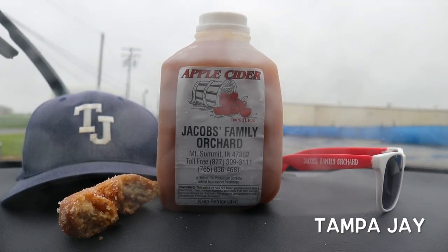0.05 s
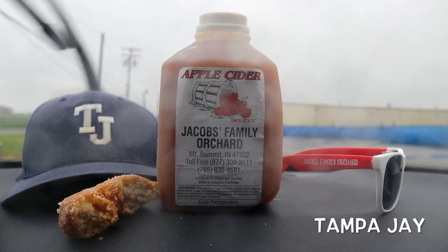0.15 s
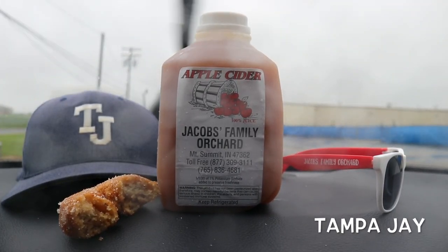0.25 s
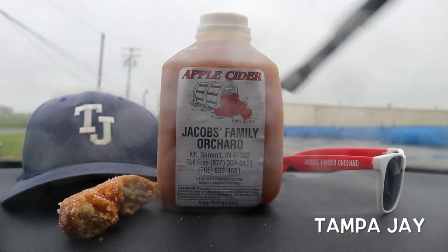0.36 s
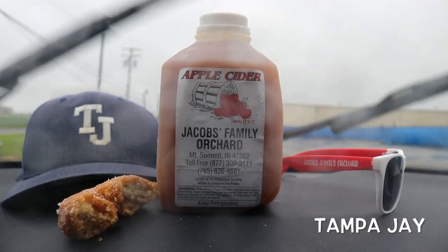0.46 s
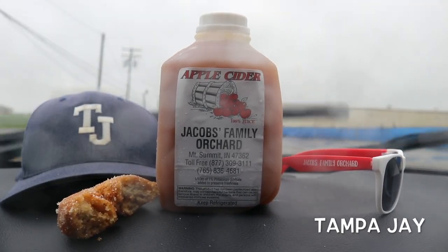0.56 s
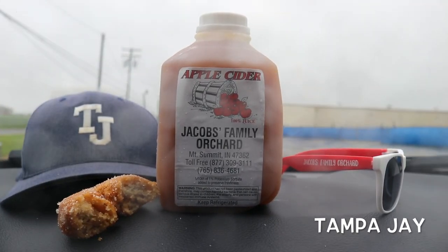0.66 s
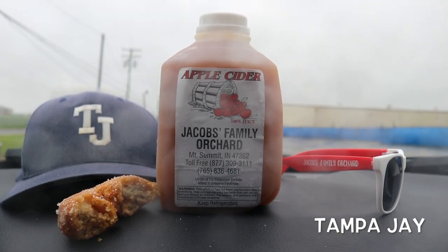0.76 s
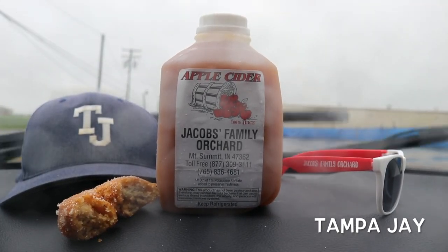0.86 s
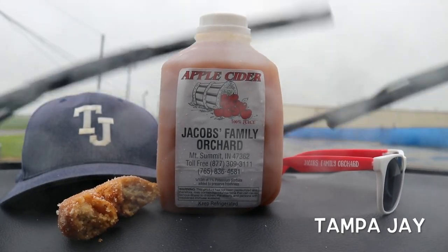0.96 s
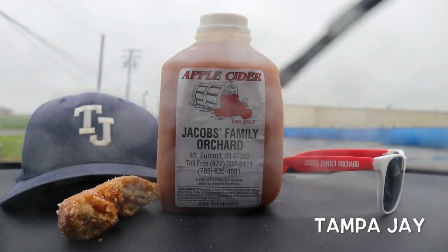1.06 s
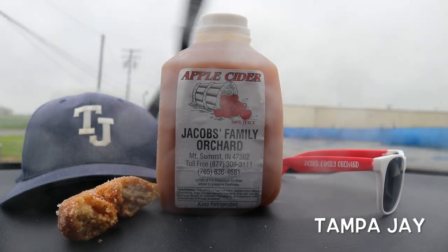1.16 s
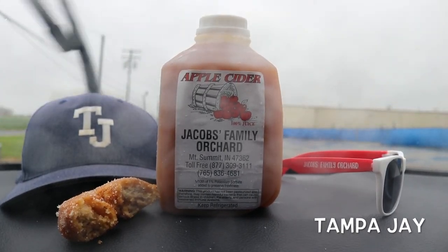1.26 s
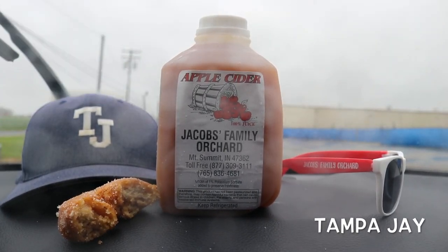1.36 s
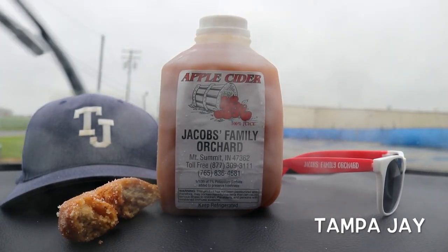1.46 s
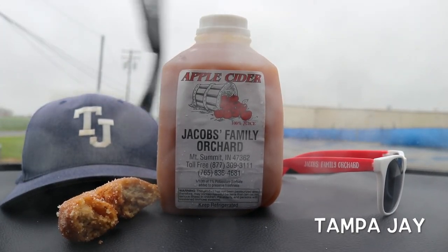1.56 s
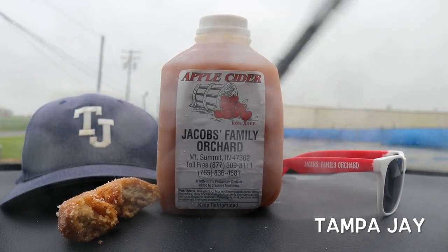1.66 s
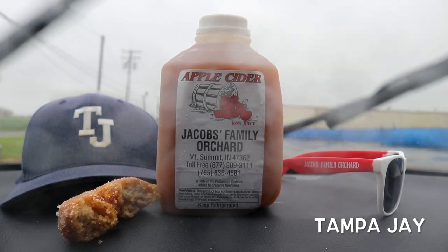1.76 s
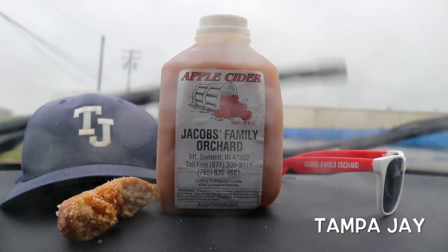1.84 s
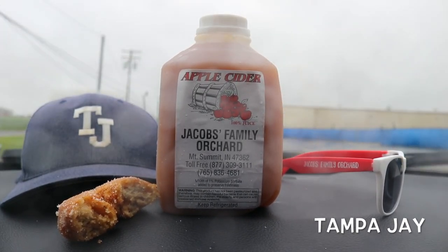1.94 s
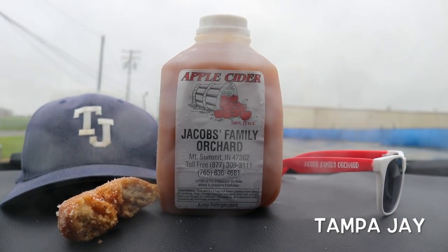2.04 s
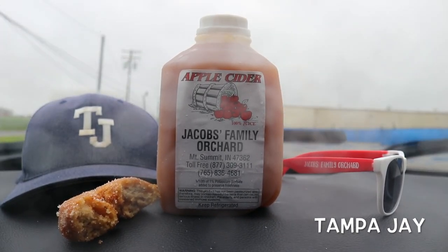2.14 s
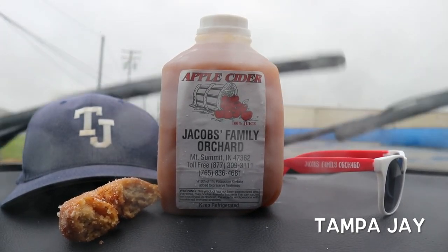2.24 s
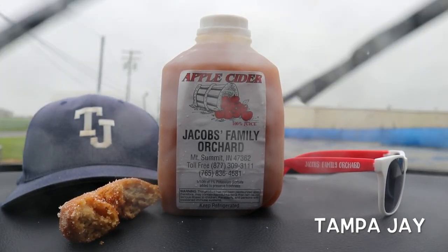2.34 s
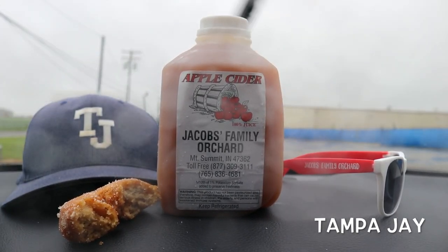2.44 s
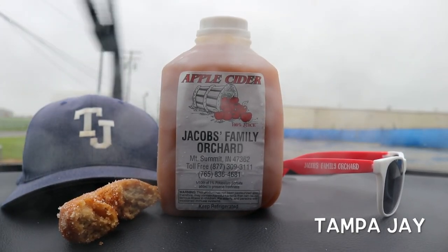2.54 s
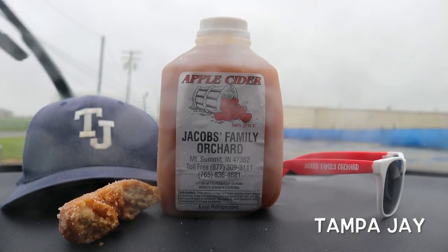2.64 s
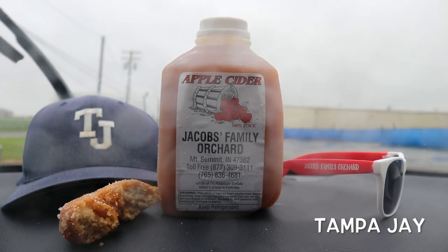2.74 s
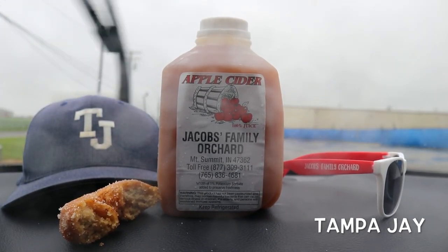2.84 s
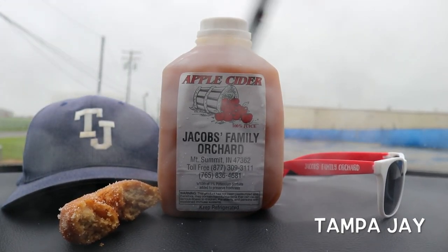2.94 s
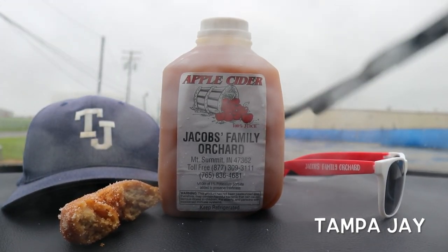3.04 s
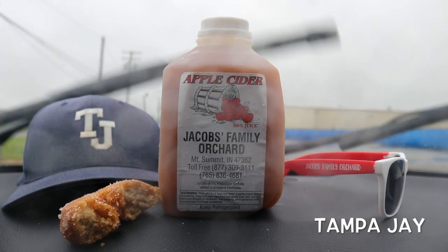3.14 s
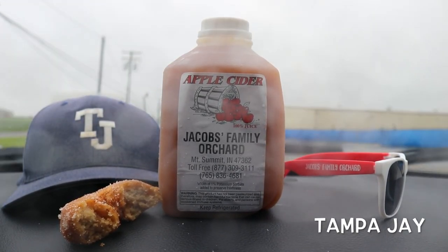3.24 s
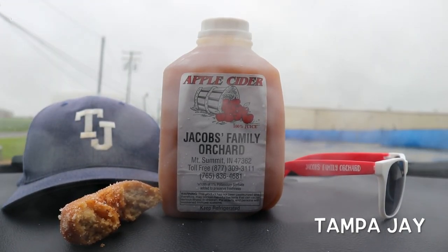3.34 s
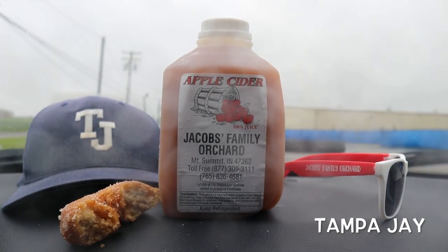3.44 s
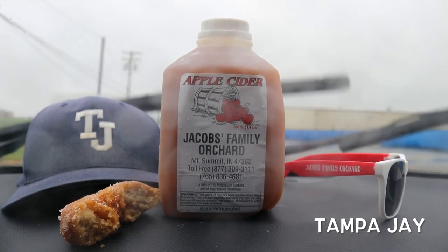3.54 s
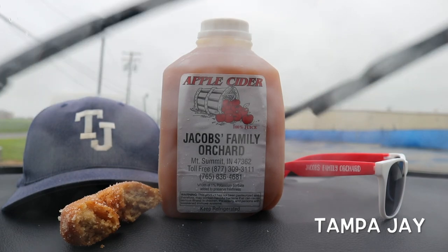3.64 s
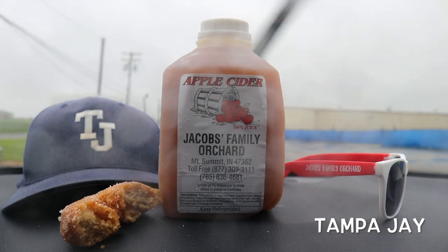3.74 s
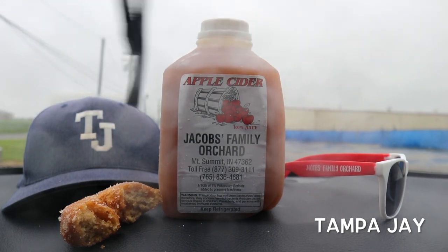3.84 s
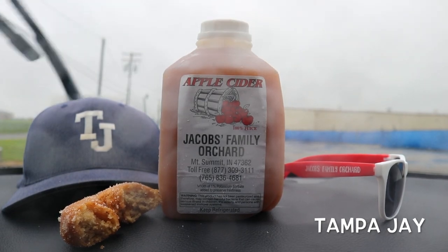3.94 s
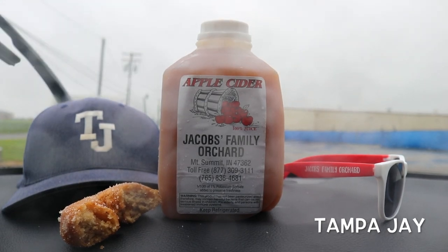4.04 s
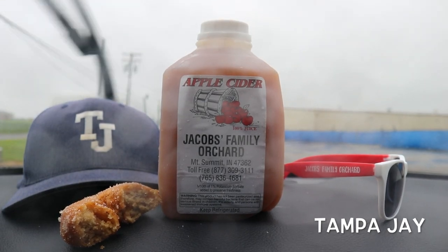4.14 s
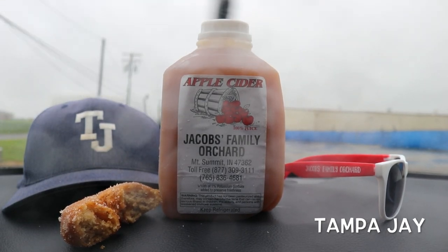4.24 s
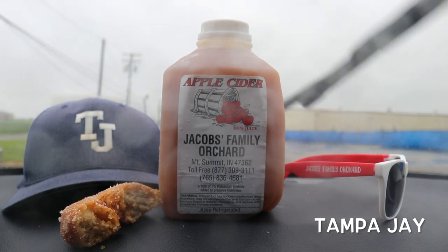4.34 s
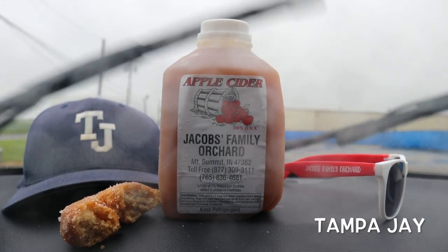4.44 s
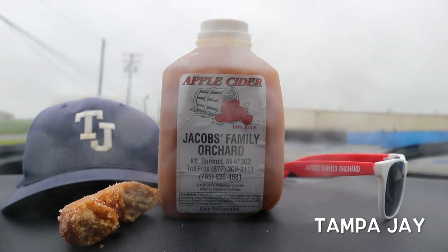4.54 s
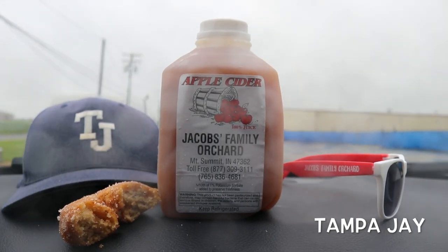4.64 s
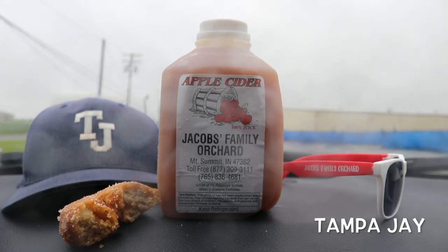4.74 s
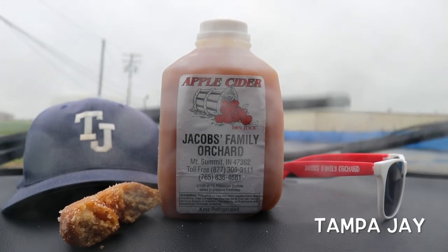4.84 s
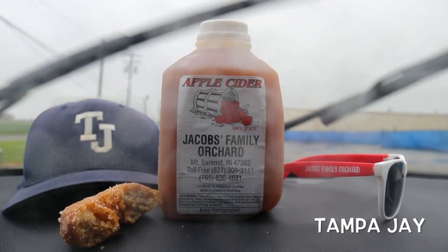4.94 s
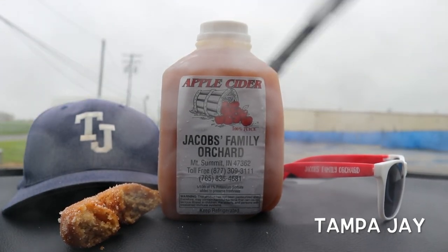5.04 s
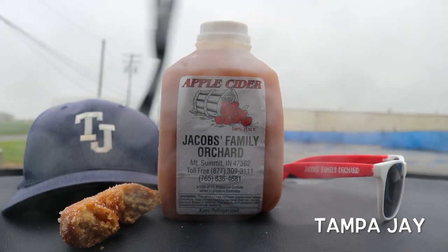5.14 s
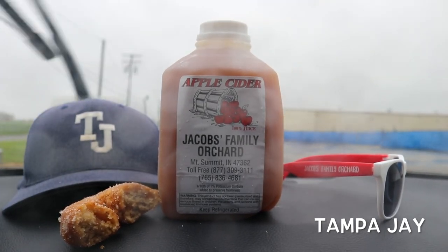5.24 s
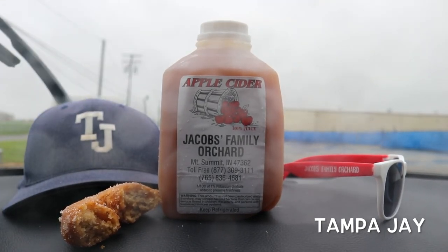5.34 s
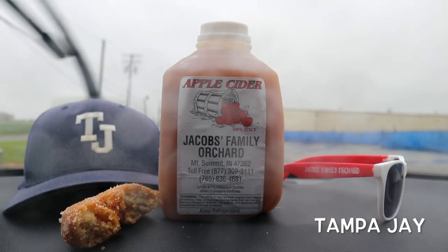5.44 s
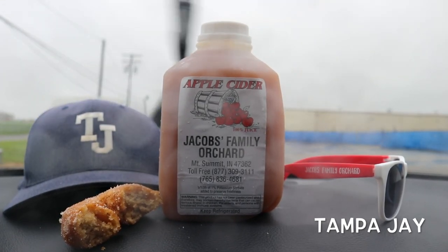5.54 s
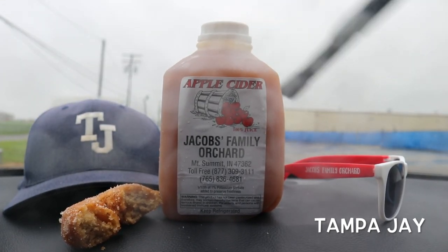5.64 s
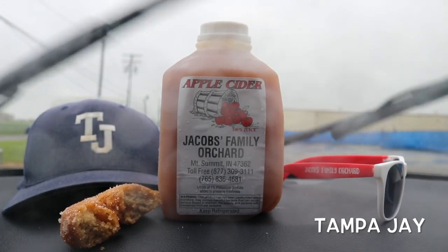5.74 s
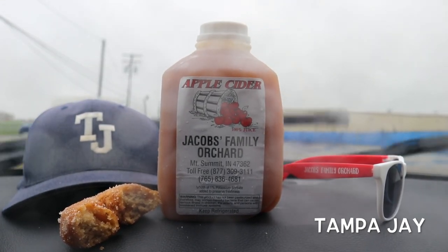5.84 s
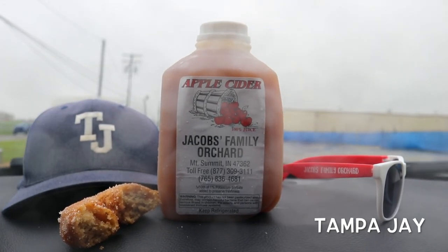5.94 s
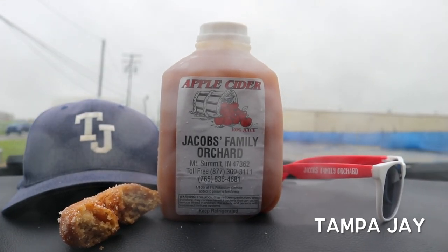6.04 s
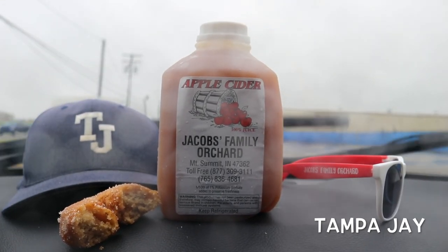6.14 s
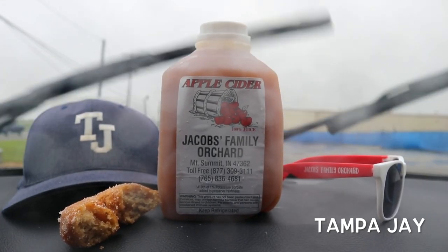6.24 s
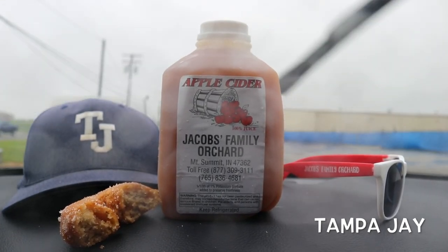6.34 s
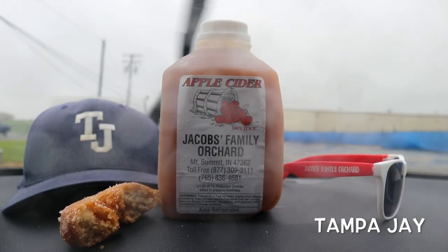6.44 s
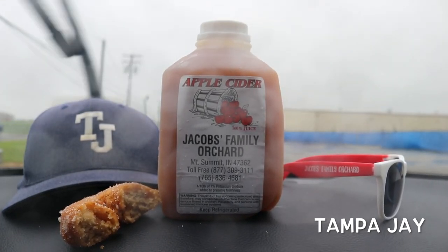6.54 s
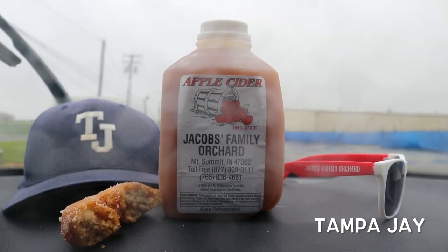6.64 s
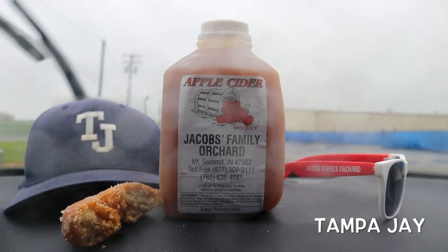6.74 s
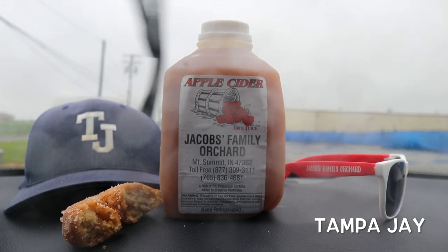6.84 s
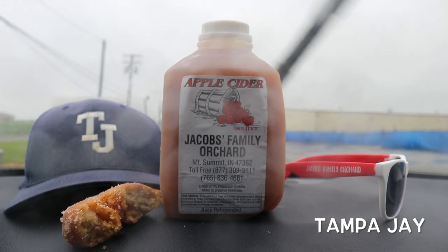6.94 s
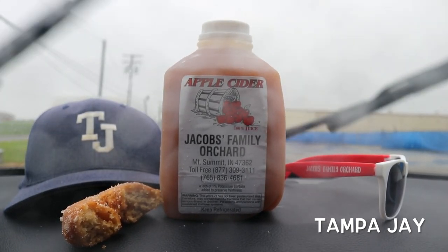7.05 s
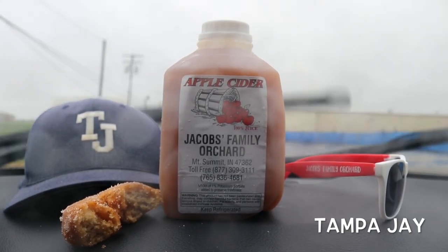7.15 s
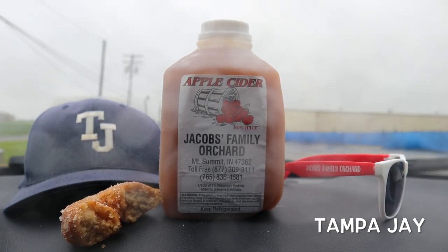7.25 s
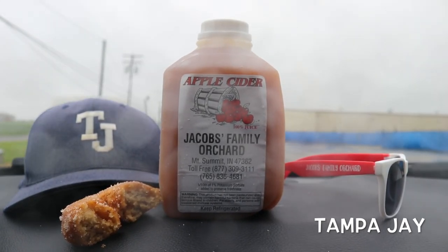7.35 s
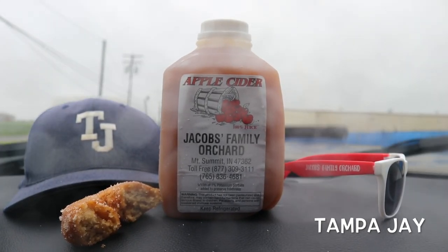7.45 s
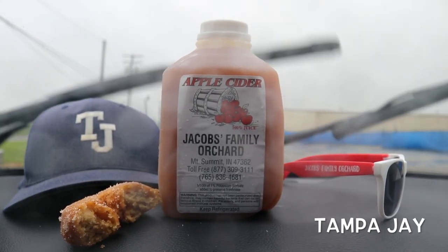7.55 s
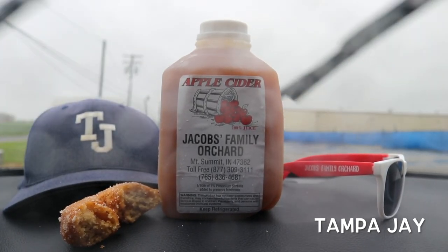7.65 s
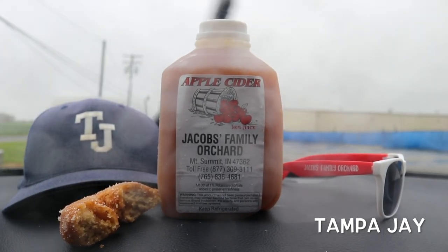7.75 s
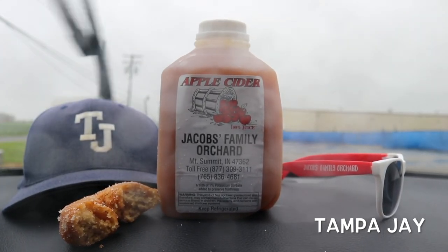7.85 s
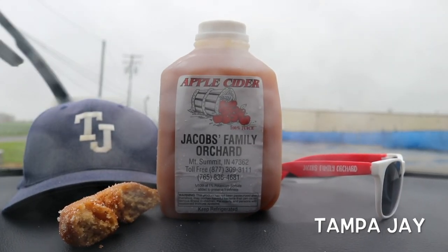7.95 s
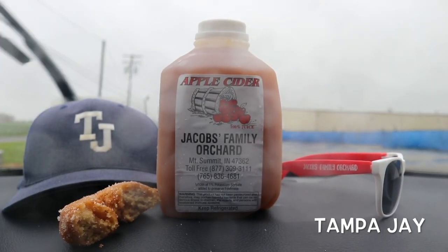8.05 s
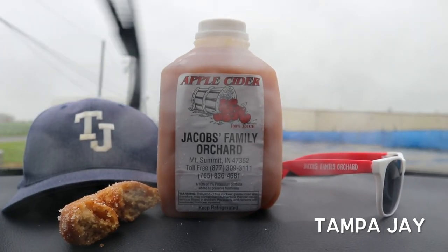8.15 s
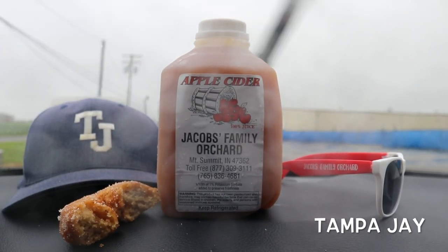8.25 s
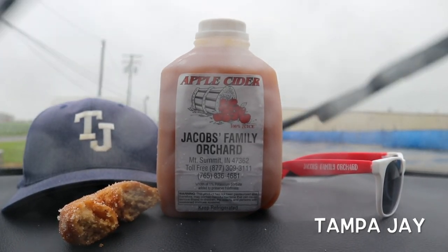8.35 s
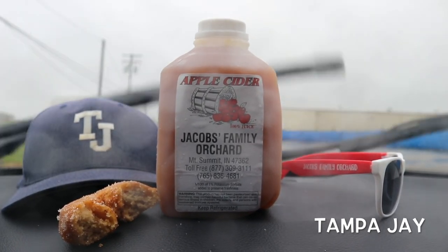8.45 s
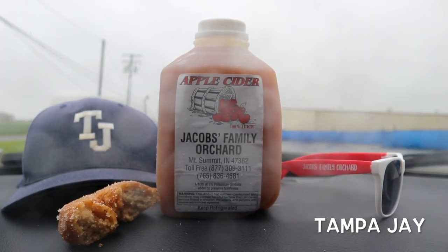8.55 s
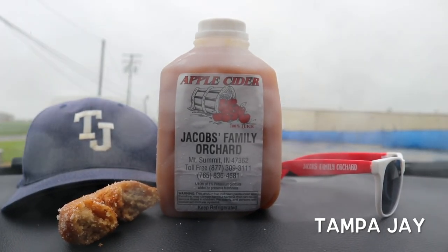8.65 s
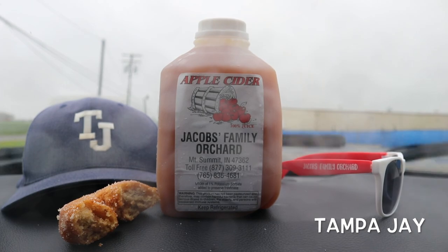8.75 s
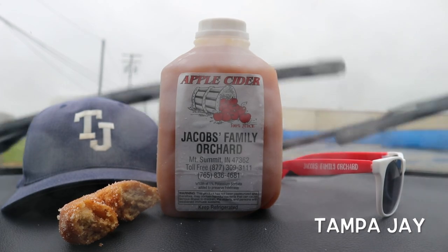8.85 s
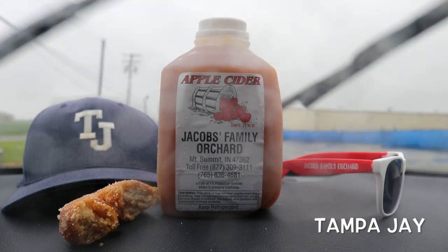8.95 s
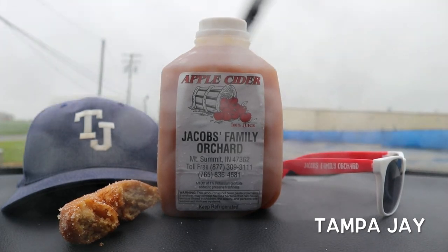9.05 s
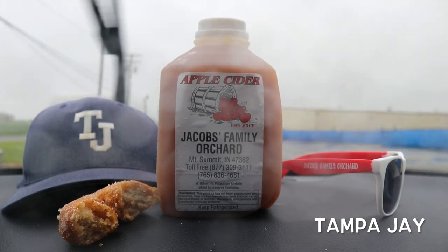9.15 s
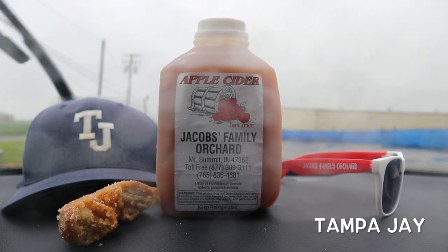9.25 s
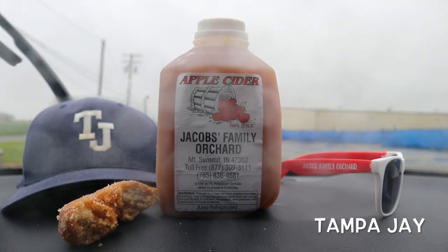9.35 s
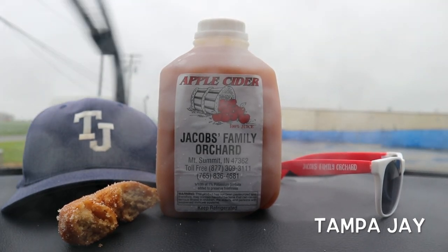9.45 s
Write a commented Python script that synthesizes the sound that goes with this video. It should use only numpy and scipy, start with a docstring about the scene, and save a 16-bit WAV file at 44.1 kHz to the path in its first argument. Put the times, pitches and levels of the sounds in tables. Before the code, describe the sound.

Rain patters on a parked car, heard from inside, as windscreen wipers sweep steadily with thumps, rubbery groans and a motor whine.

```python
"""Inside a parked car in the rain, a stereo microphone on the dashboard, close to the windscreen.
Rain hisses and patters on glass and roof; the wiper motor whines. The blades flip at the top with a chirp
and three knocks, drag down making the glass groan, thump at the bottom and return more softly as the park
switch ticks. The wipe repeats every 1.3 s; hiss and whine dip at the loud moments and creep back.
After about seven seconds heavy drops land in a cluster and a wetter rush swells."""
import sys
import numpy as np
from scipy import signal
from scipy.fft import rfft, irfft, next_fast_len
from scipy.io import wavfile
from scipy.ndimage import uniform_filter1d, map_coordinates

SR = 44100
rng = np.random.default_rng(int(sys.argv[2]) if len(sys.argv) > 2 else 0)


def wrap_up_sound(samples):
    """Save the sound to the file named by the first command line argument, as 16-bit audio."""
    columns = np.atleast_2d(samples).T
    # keep every value between -1 and 1, then stretch to whole-number steps
    tamed = np.clip(columns, -1, 1)
    steps = np.round(tamed * 32767).astype(np.int16)
    wavfile.write(sys.argv[1], SR, steps)


N = 418509

FIRST_TURN_S, CYCLE_S = .081, 1.3218
# Slow changes in the rain and the wet glass: time_s, rumble_db, patter_db, grip_db
WEATHER = [(0.0, -19, 1, 1), (0.63, -21.5, -1.5, -0.5), (1.5, -23, -0.5, 1.5), (3.1, -23, -0.5, -2),
           (3.91, -21.5, 0.5, 1), (4.46, -25, 0, -1.5), (6.58, -20, 0.5, 2), (7.16, -24.5, 1, 0),
           (7.42, -17, 5, 3.5), (8.35, -23.5, 1, -0.5), (9.49, -22, 3, 4)]
# The drive through one wipe: after_top_turn_s, whine_hz, over_background_db, arm_over_drag_db
WIPER_DRIVE = [(0, 576.6, 17.5, -16), (.09, 544.6, 18.5, -31), (.15, 499.7, 4.5, -41), (.27, 520, 13, -16),
               (.4, 559, 18.5, -9.5), (.47, 573.9, 16.5, 5.5), (.56, 578.7, 19, 0),
               (.64, 597.3, 17.5, -13.5), (.72, 584, 19, -3), (.77, 534.7, 24, -3.5), (.9, 500, 9, -31),
               (1.0, 517.7, 16, 2), (1.12, 548.8, 10.5, -30), (1.2, 570, 19, -11),
               (1.3218, 586.6, 13.5, -1)]
# Snaps of the park switch: start_s, level_db
SWITCH_SNAPS = [(1.037, -15.5), (2.357, -17), (3.6815, -15), (5.0035, -19), (6.327, -14), (7.646, -12),
                (8.969, -12.5)]


def amp(db):
    """dB to gain."""
    return 10 ** (np.asarray(db) / 20)


def unit(x):
    """Scaled to rms 1."""
    return x / np.sqrt(np.mean(x ** 2) + 1e-20)


def along(points, hz):
    """Reads (Hz, value) points on a log frequency axis."""
    f, v = np.transpose(points)
    return np.interp(np.log(hz + 1), np.log(f + 1), v)


def curves(rows):
    """One value per sample for each column after the time."""
    s, *cols = np.transpose(rows)
    return [np.interp(np.arange(N) / SR, s, c) for c in cols]


def per_wipe(rows):
    """Curves that repeat with every cycle of the wipers."""
    s, *cols = np.transpose(rows)
    return [np.interp((np.arange(N) / SR - FIRST_TURN_S) % CYCLE_S, s, c) for c in cols]


def wobble(rate):
    """A smooth random curve, rate knots a second."""
    return map_coordinates(rng.standard_normal(int(N * rate / SR) + 4), [np.arange(N) * rate / SR])


def filtered(x, response):
    """x times a response of frequency."""
    m = next_fast_len(N + SR // 2)
    return irfft(rfft(x, m) * response(np.fft.rfftfreq(m, 1 / SR)), m)[..., :N]


def noise():
    """Two unrelated white noises."""
    return rng.standard_normal((2, N))


def band(centre_hz, half_width_hz):
    """Two unrelated bands of noise."""
    return unit(filtered(noise(), lambda hz: 1 / (1 + ((hz - centre_hz) / half_width_hz) ** 4)))


def coloured(pair, spectrum):
    """Two unrelated signals made into a stereo sound of rms 1, alike in the bass."""
    # How alike the two channels are: frequency_hz, correlation
    likeness = [(40, 0.83), (130, 0.96), (300, 0.95), (640, 0.61), (1400, 0.21), (2500, 0)]
    # Balance at the dashboard: frequency_hz, left_over_right_db
    lean = [(30, -4), (100, 0), (700, -2.5), (1300, 1), (4400, -3), (9000, 0.5)]

    def mid_side(hz):
        angle = np.arccos(np.clip(along(likeness, hz), -1, 1)) / 2
        return amp(along(spectrum, hz)) * [np.cos(angle), np.sin(angle)]

    mid, side = filtered(pair, mid_side)
    stereo = np.array([mid + side, mid - side])
    return unit(filtered(stereo, lambda hz: amp(along(lean, hz) * [[.5], [-.5]])))


def spatter(per_second, spread_db):
    """Two streams of tiny impacts at rms 1, a few much larger than the rest."""
    hits = rng.random((2, N)) < per_second / SR
    return unit(hits * amp(spread_db * rng.exponential(size=(2, N))) * noise())


def ring(hz, t60, t, attack_s):
    """A damped vibration with a soft start."""
    return amp(-60 * t / t60) * (1 - np.exp(-t / attack_s)) * np.sin(2 * np.pi * hz * t)


def swell(t, s, db, held_s, rise_db_per_s, fall_db_per_s):
    """A level in dB that rises until s, holds and falls."""
    return db - rise_db_per_s * np.maximum(s - t, 0) - fall_db_per_s * np.maximum(t - s - held_s, 0)


def add(track, s, sound, pan_db=0):
    """Places a mono or stereo sound in the track; positive pan is left."""
    part = track[:, round(s * SR):][:, :sound.shape[-1]]
    part += amp([[pan_db / 2], [-pan_db / 2]]) * sound[..., :part.shape[1]]


def cabin(x):
    """The small padded cabin: a short echo whose treble dies first."""
    # Decay of the cabin: frequency_hz, t60_s
    decay = [(200, .1), (2000, .07), (10000, .045)]
    hz, t, spectra = signal.stft(rng.standard_normal((2, SR // 4)), SR, nperseg=256)
    tail = signal.istft(spectra * amp(-60 * t / along(decay, hz)[:, None]), SR, nperseg=256)[1]
    return signal.fftconvolve(x, tail / np.linalg.norm(tail[0]), axes=1)[:, :N]


def background_level():
    """Base level of rain and motor in dB: a quick dip, then a steady climb until the next."""
    # Dips, timed near the thumps and groans: start_s, level_db
    dips = [(0, -45.5), (.165, -48.5), (.373, -52.5), (.837, -50), (1.502, -52), (1.77, -49.5),
            (2.17, -50.5), (2.824, -52), (3.087, -51.5), (3.493, -50.5), (4.144, -52.5), (4.412, -52.5),
            (4.81, -51.5), (5.467, -50.5), (5.739, -50.5), (6.113, -49), (6.791, -51.5), (7.1, -49),
            (7.428, -48.5), (8.112, -51.5), (8.364, -50.5), (8.8, -47.5), (9.432, -49)]
    drop_s, climb_db_per_s = 0.0091, 8.5
    (s, db), t = np.transpose(dips), np.arange(N) / SR
    last = np.clip(np.searchsorted(s, t, "right") - 1, 0, None)
    return uniform_filter1d(db[last] + climb_db_per_s * (t - s[last]), round(drop_s * SR))


def rain():
    """Far drops merge into hiss, near ones patter on the glass, the car body rumbles."""
    # Spectrum of the far drops: frequency_hz, level_db
    hiss_spectrum = [(1060, -26), (1800, -55), (1990, -28), (2540, -4), (2750, -2), (3840, -9),
                     (4690, -8.5), (5870, -1.5), (7700, -4), (9830, -4), (15600, -12.5)]
    # Spectrum of the near drops: frequency_hz, level_db
    patter_spectrum = [(240, -8), (400, -6), (561, -4), (617, -8.5), (723, -3.5), (874, -11.5), (1240, -13),
                       (1890, -19.5), (2040, -20.5), (5000, -35.5), (6500, -41), (11000, -120)]
    # Spectrum of the car body: frequency_hz, level_db
    rumble_spectrum = [(12, -41), (20, -8.5), (64, -14.5), (110, -10), (140, -14), (240, -120)]
    # A wetter rush that grows late: time_s, over_background_db
    spray_levels = [(0, -7), (6, -5.5), (7.3, -4.5), (7.4, 4), (7.56, 0), (8.1, -1), (8.5, -2), (8.8, 0.5),
                    (9.49, 0)]
    background_db, (rumble_db, patter_db, _) = background_level(), curves(WEATHER)
    fine, coarse = spatter(2500, spread_db=2.5), spatter(900, spread_db=2)
    hiss = amp(5 + 0.7 * wobble(14)) * coloured(noise() + 0.28 * fine, hiss_spectrum)
    patter = amp(16 + patter_db + 1.2 * wobble(18)) * coloured(noise() + 0.32 * coarse, patter_spectrum)
    dip_db = background_db - background_db.mean()
    rumble = amp(rumble_db + 0.18 * dip_db + 3.6 * wobble(9)) * coloured(noise(), rumble_spectrum)
    gusts = amp(2.2 * wobble(12))
    spray = amp(curves(spray_levels)[0] + [[-1.5], [1.5]]) * gusts * band(3600, 900)
    return amp(background_db) * (hiss + patter + spray) + rumble


def drops_and_clicks():
    """Heavy drops and small wiper clicks: bursts of noise whose bright part dies before the dull."""
    # Heavy drops on the car: start_s, level_db, treble_db, pan_db
    drops = [(0.336, -30, 19, -11), (2.145, -41, 0, -17), (2.4494, -35, -20, -0.5), (2.812, -34, -21, -2),
             (3.7749, -38, -13, 3), (7.3664, -30, -8, -9), (7.3857, -34, 0, -12), (7.395, -20.5, -7, -13),
             (7.41, -31, -5, -9), (7.4233, -27, -9, -16), (7.8603, -28, 2, -12), (7.9626, -32, -22, -4.0),
             (8.026, -26, 0, -12), (8.1196, -37, -5, -21), (8.4445, -30, -20, -13), (8.7525, -33, -5, -9)]
    # A linkage joint clicks halfway down: start_s, level_db
    joint_clicks = [(.5302, -33), (1.8523, -31), (3.1747, -30.5), (4.4966, -33), (5.821, -32),
                    (7.1407, -31.5)]
    joint = [(s, db, -12, -9) for s, db in joint_clicks]
    settling = [(s + 0.038, db - 16, -17, -3) for s, db in SWITCH_SNAPS]  # a dull tap after each snap
    out, t = np.zeros((2, N)), np.arange(SR // 20) / SR
    dull_band = signal.butter(2, [800, 4800], "bandpass", fs=SR, output="sos")
    bright_band = signal.butter(2, [5500, 12000], "bandpass", fs=SR, output="sos")
    attack = 1 - np.exp(-t / 0.001)
    for s, db, treble_db, pan_db in drops + joint + settling:
        burst = rng.standard_normal((2, len(t)))
        dull = amp(-60 * t / 0.023) * unit(signal.sosfilt(dull_band, burst[0]))
        bright = amp(treble_db - 60 * t / 0.0035) * unit(signal.sosfilt(bright_band, burst[1]))
        add(out, s, amp(db + 1.5) * attack * (dull + bright), pan_db)
    return out


def motor():
    """The gear whine follows the motor's speed; two housing resonances hum beside it."""
    hz, db, _ = per_wipe(WIPER_DRIVE)
    waver = amp(1.8 * wobble(25))
    phase = 2 * np.pi * np.cumsum(hz * (1 + .004 * wobble(25))) / SR
    whine = amp([[-5], [-3]]) * unit(waver * np.sin(phase))
    low, high = band(526, 34), band(744, 19)
    housing = amp(-10) * (low[0] + 1.4 * low) + amp(-11.5) * high
    return amp(background_level() + db) * (whine + housing)


def park_switch():
    """The contact opens softly and snaps shut once a cycle, to the right of the microphone."""
    # Modes of the switch: pitch_hz, level_db, t60_s
    modes = [(2800, -14, .01), (4300, -14, .008), (5600, -4, .012), (6550, -1, .016), (6900, -4, .01),
             (8200, -10, .008)]
    out, t = np.zeros((2, N)), np.arange(SR // 10) / SR
    housing = signal.butter(2, [2500, 9500], "bandpass", fs=SR, output="sos")
    openings = [(s - 0.02, db - 5.5) for s, db in SWITCH_SNAPS]
    for s, db in SWITCH_SNAPS + openings:
        tones = sum(amp(level + rng.normal(0, 1.5)) * ring(hz, t60, t, .0003) for hz, level, t60 in modes)
        crack = signal.sosfilt(housing, rng.standard_normal(len(t))) * amp(-60 * t / .012)
        add(out, s, amp(db - 8.5) * (tones + 0.44 * crack), pan_db=-9.5)
    return out


def linkage_thumps():
    """At each turn the linkage knocks and thumps the panels, and loose joints rattle."""
    # Three blows at each top turn: start_s, first_db, second_db, third_db
    top_turns = [(.086, -4, -0.5, -1.5), (1.411, -4, -1, -4.5), (2.73, -2, 1, -0.5), (4.055, -3.5, 1, -2.5),
                 (5.378, -4.5, 0.5, -3), (6.701, -4, -1.5, -5.5), (8.019, -2, -1, -5),
                 (9.34, -10.5, -1.5, -3.5)]
    # Make-up of those three blows: delay_s, knock_db, rattle_db, t60_s
    top_blows = [(0, -15.5, -34, 0.052), (.067, -12, -29.5, 0.033), (.091, -24, -76, 0.06)]
    # Other blows, most at the bottom turn: start_s, level_db, t60_s, rattle_db
    other_blows = [(.357, -12, 0.099, -20), (.626, -23, .05, -30), (.813, -2, 0.088, -26),
                   (.869, -11, 0.038, -21), (2.08, -10, 0.046, -34), (2.131, -2, 0.051, -21.5),
                   (2.154, -7, 0.038, -29), (2.577, -7, 0.053, -25), (3.007, -6, 0.032, -29),
                   (3.4, -13.5, 0.058, -25), (3.456, -7, 0.078, -17), (3.479, 0.5, 0.034, -36),
                   (4.78, -3, 0.056, -23.5), (6.103, -6, 0.071, -20.5), (6.134, -3, 0.037, -32),
                   (6.17, -6, 0.036, -28), (6.206, -9.5, 0.067, -25), (7.37, -21, .064, -26),
                   (7.428, 2, 0.03, -27), (7.459, -12, 0.034, -14.5), (8.75, -6.5, 0.074, -21),
                   (9.149, -16, 0.049, -22)]
    # Modes of the panels: pitch_hz, level_db, share_of_t60
    panel_modes = [(211, 11, 0.63), (265.7, 2.5, 0.95), (315.4, 4.5, 0.82), (374, 11.5, 0.26)]
    blows = [(s + delay, db, *makeup) for s, *levels in top_turns
             for db, (delay, *makeup) in zip(levels, top_blows)]
    blows += [(s, db, -15.5, rattle_db, t60) for s, db, t60, rattle_db in other_blows]
    out, t = np.zeros((2, N)), np.arange(SR // 7) / SR
    rattle_band = signal.butter(2, [600, 2000], "bandpass", fs=SR, output="sos")
    rattle_shape = (t / .015) * np.exp(1 - t / .015)
    attack_s = .007  # rubber bushes spread the blow
    for s, db, knock_db, rattle_db, t60 in blows:
        chance = rng.standard_normal((3, len(panel_modes)))
        for (hz, mode_db, share), size, detune, side in zip(panel_modes, *chance):
            panel = ring(hz * (1 + 0.037 * detune), t60 * share, t, attack_s)
            add(out, s, amp(db - 3 + mode_db + 3.86 * size) * panel, pan_db=0.99 * side)
        knock = ring(578, 1.09 * t60, t, attack_s) + 0.77 * ring(800, .5 * t60, t, attack_s)
        add(out, s, amp(db + 8.5 + knock_db) * knock, pan_db=-2.5)
        rattle = signal.sosfilt(rattle_band, rng.standard_normal((2, len(t)))) * rattle_shape
        add(out, s, amp(db + 4 + rattle_db) * rattle)
    return out


def blade_flips():
    """The rubber lip squeaks as it rolls over at the top; at the bottom it scuffs, flat and rough."""
    # Flips of the lip: time_s, level_db, pitch_hz, pan_db
    chirps = [(0.081, -23, 1485, -3), (0.907, -33.5, 1375, -3), (1.404, -22, 1500, -4.5),
              (2.7241, -23, 1490, -2), (4.05, -25.5, 1506, 3), (5.3715, -26, 1519, 4),
              (6.1913, -30.5, 1373, -4), (6.6937, -25, 1518, 2), (7.5086, -28.5, 1450, -1),
              (8.0098, -25.5, 1525, 4), (8.8321, -32, 1340, -7), (9.3337, -25.5, 1514, 0)]
    out, t = np.zeros((2, N)), np.arange(SR // 30) / SR
    glide = .14 * np.exp(-t / .003) - .32 * np.clip((t - .008) / .011, 0, 1)  # drops as the lip lands
    envelope = (t / .0045) * np.exp(1 - t / .0045)
    lag_rad = [[0], [-1.7]]  # the squeak reaches the left side of the microphone first
    for s, db, hz, pan_db in chirps:
        grip = uniform_filter1d(rng.standard_normal((2, len(t))), 90) * np.sqrt(90)  # uneven contact
        at_top = np.cos(2 * np.pi * (s - FIRST_TURN_S) / CYCLE_S) > 0
        phase = 2 * np.pi * np.cumsum(hz * (1 + at_top * glide)) / SR
        roughness = (.25 if at_top else .7) * grip[0]
        squeak = envelope * (1 + 0.28 * grip[1]) * np.sin(phase + roughness + lag_rad)
        add(out, s - .003, amp(db + 8) * squeak, pan_db)
    return out


def groan_level():
    """Level of the windscreen's groan in dB: strong going down, weaker coming up, shudders at turns."""
    # Groans of each wipe: downstroke_peak_s, peak_db, held_s, tail_db, upstroke_db
    strokes = [(.42, -6.5, 0.11, -12, -19), (1.771, -4.5, .01, -13.5, -20.5),
               (3.085, -5, 0.093, -19, -20.5), (4.411, -5.5, 0.12, -18, -20.5),
               (5.729, -6, 0.089, -18, -15.5), (7.058, -6, 0.063, -18, -16.5),
               (8.38, -4.5, 0.016, -13.5, -15.5)]
    # The windscreen shudders at a turn: centre_s, level_db
    shudders = [(.16, -14), (.9, -12), (1.5, -16), (2.168, -8.5), (2.83, -15.5), (3.5, -4.5), (4.15, -16),
                (4.812, -4), (5.47, -14.5), (6.21, -15), (6.79, -11.5), (7.5, -15), (8.11, -11),
                (8.24, -14.5), (8.801, -9.5), (9.439, -12)]
    tail_s, up_after_s, up_s, shudder_s = 0.21, .62, 0.25, 0.018
    judder_hz, judder_db = 11.5, 2  # the blade grips and lets go, so the groan throbs
    t = np.arange(0, N, 32) / SR
    level = np.full(len(t), -32.0)  # floor between groans
    for s, peak_db, held_s, tail_db, up_db in strokes:
        throb = judder_db * (np.cos(2 * np.pi * judder_hz * (t - s)) - 1)
        for part in [(s, peak_db, held_s), (s, tail_db, tail_s), (s + up_after_s, up_db, up_s)]:
            level = np.maximum(level, swell(t, *part, rise_db_per_s=200, fall_db_per_s=203) + throb)
    for s, db in shudders:
        shudder = swell(t, s - shudder_s / 2, db, shudder_s, rise_db_per_s=452, fall_db_per_s=452)
        level = np.maximum(level, shudder)
    return np.interp(np.arange(N) / SR, t, level)


def blades():
    """Rubber sticks and slips near the windscreen's lowest mode, rubs out noise and shakes the arm."""
    # The windscreen's groan through one wipe: after_top_turn_s, pitch_hz
    groan_pitch = [(0, 124), (.1, 132.2), (.25, 115.7), (.33, 108.7), (.4, 119.6), (.46, 127), (.62, 118),
                   (.76, 124), (.9, 120.4), (1.05, 125), (1.3218, 122)]
    # Rubber drag through one wipe: after_top_turn_s, level_db
    drag_levels = [(0, -24.5), (.15, -32), (.3, -28), (.5, -27.5), (.65, -28.5), (.78, -22), (.92, -31),
                   (1.1, -26), (1.25, -25.5), (1.3218, -29.5)]
    # Spectrum of the rubbed panels: frequency_hz, level_db
    drag_spectrum = [(82, -53), (140, -4), (188, -7), (297, -10.5), (440, -17), (480, -18.5), (620, -30),
                     (1060, -120)]
    groan_db, hz = groan_level(), per_wipe(groan_pitch)[0]
    drag_db, arm_db = per_wipe(drag_levels)[0] + curves(WEATHER)[2], per_wipe(WIPER_DRIVE)[2]
    phase = 2 * np.pi * np.cumsum(hz * (1 + 0.03983 * wobble(25))) / SR
    tone = amp(groan_db + 1.5 + 1.45 * wobble(28)) * (np.sin(phase) + 0.061 * np.sin(2 * phase))
    groan = tone * amp([[.4], [-.4]]) + amp(groan_db - 11) * band(138, 19)
    arm_noise = band(306, 31)
    arm = amp(arm_db - 1.5) * (arm_noise[0] + 0.18 * arm_noise)
    rubbing = amp(2.5 + 1.68 * wobble(22)) * coloured(noise(), drag_spectrum)
    return groan + amp(drag_db) * (rubbing + arm)


def scene():
    """At the dashboard: clicks and thumps with their cabin echo, over blades, motor and rain."""
    clicks = drops_and_clicks() + park_switch()
    turns = linkage_thumps() + blade_flips()
    echo = cabin(amp(-4) * clicks + amp(-15) * turns)
    return clicks + turns + echo + blades() + motor() + rain()


def record(dry):
    """Peaks are rounded off; nothing is kept above the band limit."""
    ceiling, top_hz = .9, 15725
    rounded = dry / (1 + np.abs(dry / ceiling) ** 5) ** (1 / 5)
    return filtered(rounded, lambda hz: hz < top_hz)


dry = scene()
out = record(dry)
wrap_up_sound(out)
```